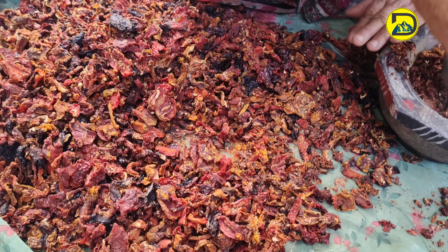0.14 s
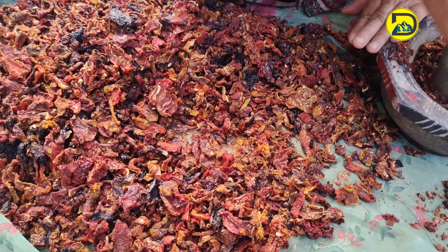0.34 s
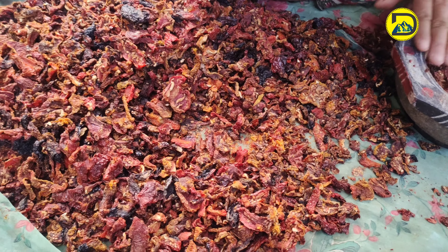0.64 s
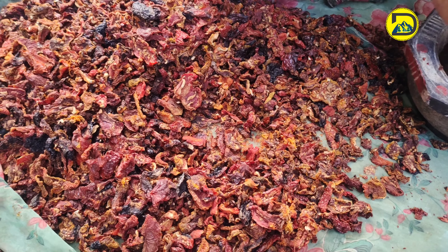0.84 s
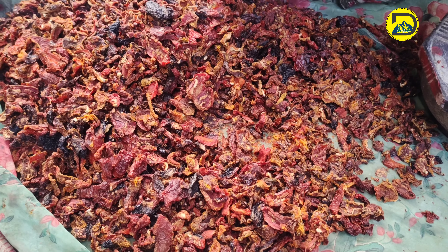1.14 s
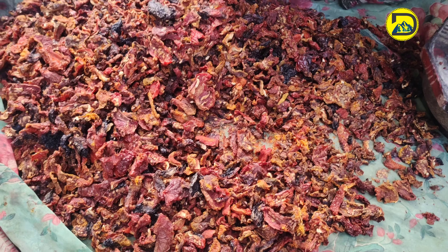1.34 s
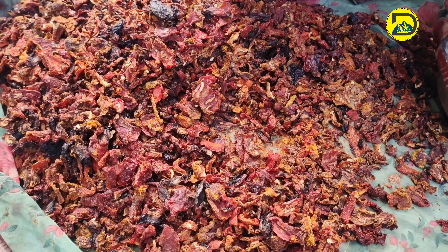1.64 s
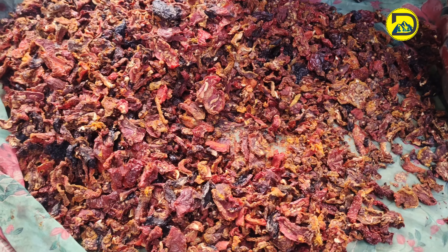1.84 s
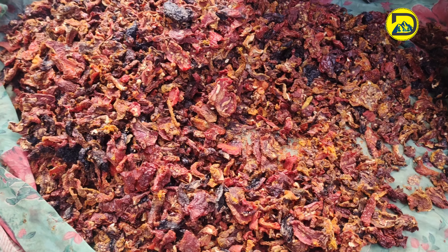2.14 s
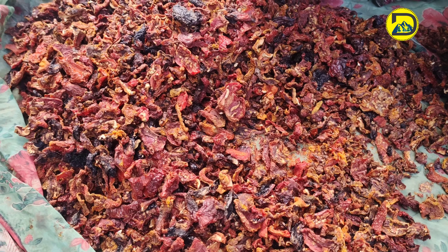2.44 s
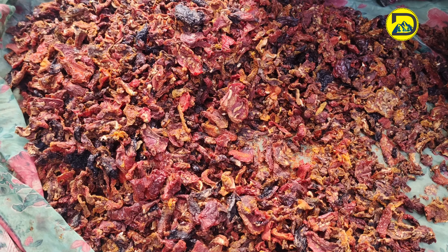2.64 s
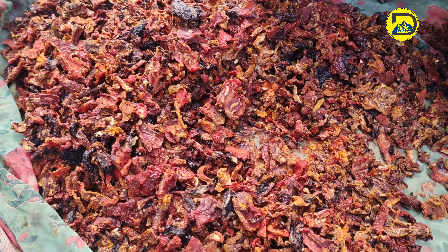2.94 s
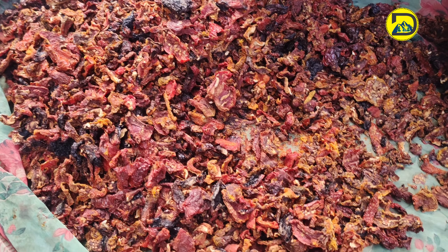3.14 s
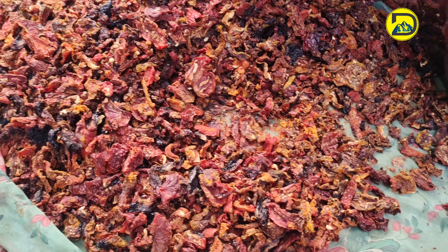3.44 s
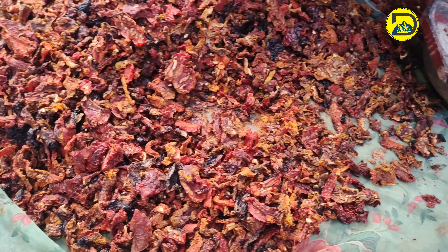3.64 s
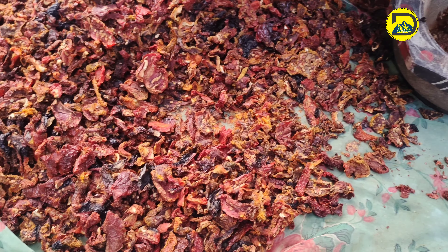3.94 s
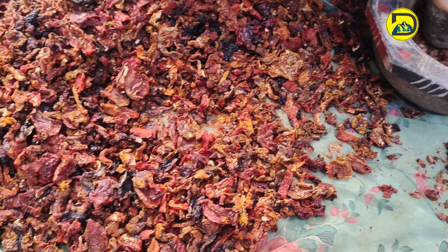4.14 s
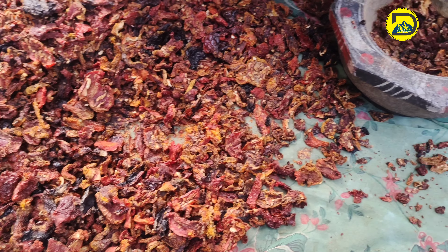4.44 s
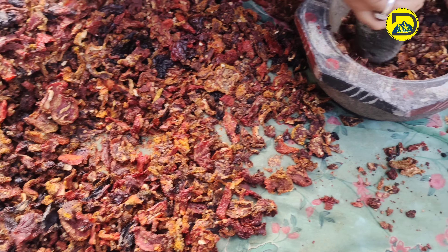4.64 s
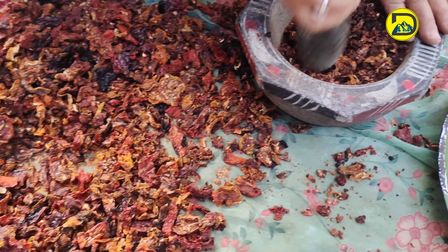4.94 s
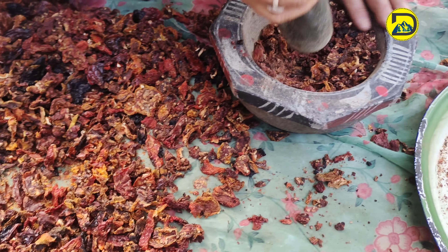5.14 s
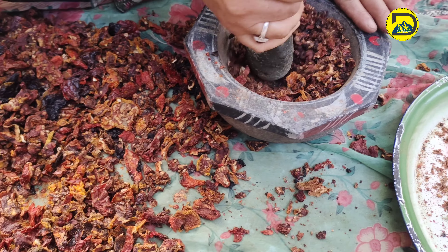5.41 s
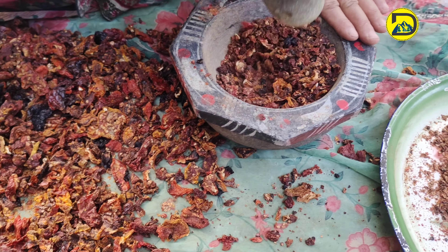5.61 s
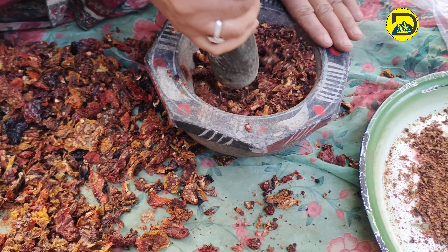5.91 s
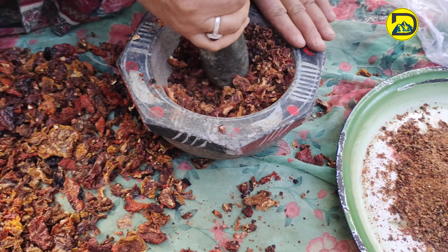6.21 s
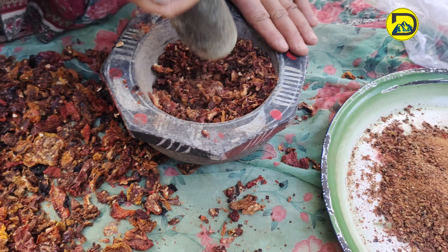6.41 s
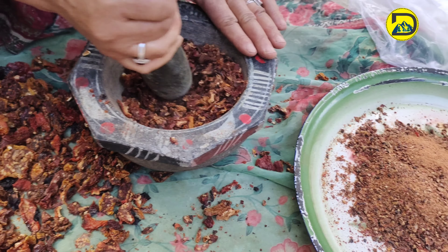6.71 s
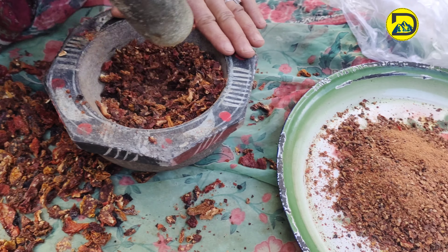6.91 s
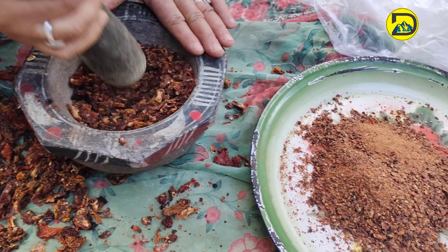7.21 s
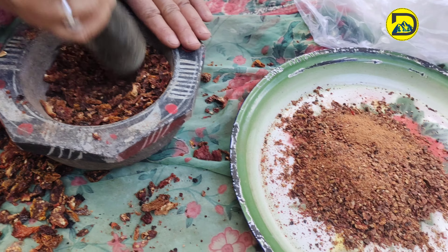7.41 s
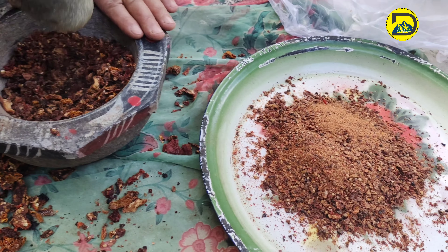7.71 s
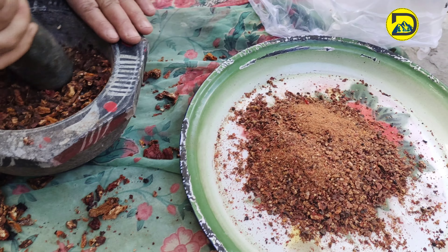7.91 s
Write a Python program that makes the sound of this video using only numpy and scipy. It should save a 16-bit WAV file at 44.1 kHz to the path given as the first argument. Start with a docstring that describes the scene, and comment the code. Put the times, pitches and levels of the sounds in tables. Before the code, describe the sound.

A stone pestle pounds dried tomato pieces in a stone mortar on the ground, a little over two strokes a second. Each stroke crunches brittle flakes and lands with a dull thud, and harder blows make the bowl ring briefly. After the fourth stroke the sound cuts out for a moment, then the pounding carries on. It is heard close up, over a quiet outdoor hush and a faint rustle.

```python
"""A stone pestle pounds dried tomato pieces in a stone mortar on a cloth on the ground, outdoors.
From the start, over a quiet hush and a faint rustle, each stroke crunches brittle flakes, then lands with
a dull thud; where it gets through to the stone, the bowl rings briefly, and nearby walls answer.
After the fourth stroke the sound drops out for 0.3 s. The pounding then goes on to the end, about
0.4 s a stroke, while now and then the mortar hops, a flake ticks or a loose heap slides."""
import sys
import numpy as np
from scipy import signal
from scipy.fft import rfft, irfft, next_fast_len
from scipy.io import wavfile
from scipy.ndimage import uniform_filter1d, map_coordinates

SR = 44100
rng = np.random.default_rng(int(sys.argv[2]) if len(sys.argv) > 2 else 0)


def dump_mix(stems):
    """Bounce the given channels to the path in sys.argv[1] as a 16-bit WAV at rate SR."""
    frames = np.atleast_2d(stems).T  # one column per channel
    limited = np.clip(frames, -1, 1)  # hard clip at full scale
    pcm = np.round(limited * 32767).astype(np.int16)
    wavfile.write(sys.argv[1], SR, pcm)


N = 355446

# the pestle packs the flakes, then lands: (landing time [s], pressing time before it [s], crunch [dB],
# hollow resonance [Hz], hollow boost [dB], crack resonance [Hz], thud [dB], thud base pitch [Hz],
# stone ring trim [dB])
STROKES = [(0.128, .008, -26.5, 1560, 11, 3070, -19, 103.6, 0.5),
           (0.5189, 0.0087, -31.5, 1420, 11.5, 2470, -6.5, 150.9, -7),
           (0.973, 0.013, -25.5, 1510, 14, 3130, -29.5, 187, -4),
           (1.386, .019, -25.5, 1550, 8.5, 3000, -15.5, 149, 4.5),
           (2.281, .014, -26.5, 1700, 8.5, 3930, -29.5, 165, 6),
           (2.688, .010, -29, 1520, 7, 3880, -25, 164, 0),
           (3.085, 0.016, -33, 1410, 6.5, 3860, -16.5, 155, -21),
           (3.477, .005, -33, 920, 18, 3900, -7.5, 145, -0.5),
           (3.861, 0.0067, -29, 1560, 12.5, 3760, -9.5, 147, 0.5),
           (4.275, .023, -26.5, 2200, 6.5, 3780, -16.5, 145, -4),
           (4.683, 0.01, -27, 1370, 13, 2930, -14.5, 145.7, 1.5),
           (5.1043, .0075, -29, 1490, 10, 3570, -7, 149.6, 4.5),
           (5.5297, 0.012, -25, 1300, 7.5, 2670, -13, 142.7, 5),
           (5.938, .022, -23, 1800, -2, 3260, -21.5, 150.5, -2),
           (6.363, .010, -22.5, 890, 8.5, 2960, -27.5, 115.4, -4),
           (6.7852, .013, -23.5, 857, 20.5, 2750, -14, 158.4, 5),
           (7.1946, .015, -24.5, 2070, 8.5, 2940, -24.5, 112, 2),
           (7.6115, .014, -25.5, 880, 11, 2460, -15, 139.8, -4),
           (8.006, .010, -25, 2310, 9, 3750, -17, 135.7, -2)]
# tone of the crushed flakes: (frequency [Hz], relative level [dB])
CRUNCH_EQ = [(40, -23), (110, 5.5), (220, 6.5), (400, -15.5), (560, -7), (950, -0.5), (2200, -1.5),
             (3100, 3), (4200, 0), (5400, -5.5), (7000, -2.5), (8200, -4), (10000, -5), (15500, -14.5)]
# the bowl rocks on the cloth: (pitch [Hz], relative level [dB], t60 [s])
ROCKING_MODES = [(111, -2, 0.09), (204.7, -3.5, 0.099), (265.5, -6, 0.068)]
# the mortar drops back after a blow: (time [s], level [dB])
REBOUNDS = [(0.166, -25.5), (3.905, -22), (5.15, -28.5), (7.634, -27.5), (8.045, -23)]
# mortar and pestle ring: (pitch [Hz], relative level [dB], t60 [s])
STONE_MODES = [(324, -8, 0.4), (405, -8.5, 0.27), (456.8, 8, 0.13), (605, -8.5, 0.22), (750, -12, 0.47),
               (812, -21.5, 0.26), (916, 5, 0.22), (1070, -16, 0.22), (1245, -6, 0.16), (1270, -8.5, 0.13)]
# tone of the knock on bare stone: (frequency [Hz], relative level [dB])
KNOCK_EQ = [(120, -12.5), (300, 3), (550, -8), (800, -3), (1050, -13), (1450, -17), (3000, -39)]
# single flakes snap or fall: (time [s], level [dB], pitch [Hz])
TICKS = [(.028, -48.5, 793), (.069, -44.5, 916), (.338, -43.5, 760), (0.448, -50.5, 7720),
         (.765, -50.5, 7140), (1.286, -40, 2750), (3.818, -43, 3200), (4.115, -48.5, 8000),
         (5.052, -34.5, 7980), (5.445, -51.5, 7400), (6.134, -49, 7500), (7.593, -32.5, 2890)]
# a heap of loose flakes slides: (time of peak [s], level [dB], time to swell or settle [s])
SLIDES = [(1.2, -63.5, .17), (4.0, -57.5, 0.054), (5.34, -57.5, 0.024)]
# tone of the loose flakes: (frequency [Hz], relative level [dB])
RUSTLE_EQ = [(800, -2), (2400, -1), (3500, -2.5), (5000, -14.5), (7000, -11.5), (15000, -15.5)]
# reverb tail of the walls: (frequency [Hz], t60 [s])
WALL_DECAY = [(150, 0.47), (400, 0.2), (1000, 0.19), (3000, 0.26), (7000, 0.17), (15000, 0.22)]
# tone of the outdoor air: (frequency [Hz], relative level [dB])
HUSH_EQ = [(15, -88), (25, -44.5), (91, -9.5), (126, -5), (160, -7.5), (183, -6), (246, -6.5), (410, -11.5),
           (457, -15.5), (537, -14.5), (648, -14.5), (741, -15), (1080, -20), (1450, -26), (15500, -39)]
# the pounding drifts from the right to the centre and back: (time [s], lag of the left channel [s])
LEFT_LAG = [(0, 0.00031), (3.8, 0.000011), (8.06, 0.00074)]
# how alike left and right are in a diffuse field: (frequency [Hz], correlation [0-1])
STEREO_LIKENESS = [(60, 0.98), (290, 0.9), (640, 0.38), (1400, 0.041), (15000, 0.087)]
# the two microphones differ in tone: (frequency [Hz], left minus right [dB])
MIC_BALANCE = [(300, 0), (700, -0.5), (1500, 4), (2000, 4.5), (2500, 5), (3400, 8), (4300, 2), (5600, -2),
               (7000, -12), (8500, -1), (10200, -2), (11500, -3.5), (15000, -9.5)]

FULL_CRUNCH_DB = -22.5  # a stroke on a thick bed of flakes
CRACK_DB, CRACK_SHARPENS = 1.5, 0.84  # crack boost in a full crunch; dB more per dB of thinner crunch
FIRM_DB = -17  # thud of an ordinary firm stroke
ROCK_DB, ROCK_GROWS = -24, 0.32  # rocking after a firm stroke; dB more per dB of thud
KNOCK_DB, KNOCK_GROWS = -38, 1.67  # knock of a firm stroke; dB more per dB of thud
DROPOUT_START_S, DROPOUT_END_S = 1.597, 1.893
TOP_HZ = 15800


def crunch(build_db=12, depth_db_per_s=330, attack_s=.001, collapse_t60=0.021, packed=0.69, spill=.35):
    """Cracking swells as the pestle packs the flakes and dies as it rests: (direct, reverb send)."""
    direct, send = np.zeros((2, N)), np.zeros((2, N))
    t = np.arange(SR // 12) / SR
    ripple_hz = np.arange(2000, 16000, 350)
    for s, press, db, hollow_hz, hollow_db, crack_hz, *_ in STROKES:
        # a deeper layer of flakes takes longer to pack and starts more softly
        rise_db = -(build_db + depth_db_per_s * press) * np.maximum(1 - t / (packed * press), 0)
        fall_db = -60 * np.maximum(t - press, 0) / collapse_t60
        pressure = amp(rise_db + fall_db) * attack(t, attack_s)
        # the flakes give way in clumps: a 1.6 dB flutter, 650 knots a second
        clumps = amp(1.6 * map_coordinates(rng.standard_normal(len(t)), [650 * t]))
        cracks = unit(diffuse(fractures(len(t), rate=14000, spread_db=1.0))) * clumps * pressure
        # the dent under the pestle resonates anew each stroke, more clearly when few flakes damp it
        crack_db = CRACK_DB + CRACK_SHARPENS * (FULL_CRUNCH_DB - db)
        dent = lambda hz: hollow_db * bump(hz, hollow_hz) + crack_db * bump(hz, crack_hz)
        # reflections inside the bowl ripple the treble
        ripple_db = 2.1 * rng.standard_normal(len(ripple_hz))
        colour = lambda hz: dent(hz) + np.interp(hz, ripple_hz, ripple_db, left=0)
        # over all directions these colours mostly even out, so the send gets less of them
        for track, share in (direct, 1), (send, spill):
            sound = coloured(cracks, lambda hz: along(CRUNCH_EQ, hz) + share * colour(hz))
            add(track, s - press, amp(db) * unit(sound) * np.sqrt(np.mean(pressure ** 2)))
    return direct, send


def thud(t, hz, stiffening=1.44, relax_s=0.0022, swell_s=0.0027, life_s=0.011):
    """The mortar bounces on the ground: stiff under load, falling in pitch as it eases, soon damped."""
    cycles = hz * (t + stiffening * relax_s * attack(t, relax_s))
    return -np.sin(2 * np.pi * cycles) * attack(t, swell_s) * np.exp(-(t / life_s) ** 3)


def mortar(detune=0.038):
    """The low end: every blow thuds into the ground and leaves the bowl rocking; some make it hop."""
    out, t = np.zeros(N), np.arange(SR // 4) / SR
    rock_hz, level, t60 = np.transpose(ROCKING_MODES)[:, :, None]
    for s, *_, thud_db, thud_hz, _ in STROKES:
        pitch = rock_hz * np.exp(detune * rng.standard_normal(rock_hz.shape))
        modes = amp(level - 60 * t / t60) * np.sin(2 * np.pi * pitch * t)
        rocking = modes.sum(axis=0) * attack(t, 0.016)
        # a hard blow pins the bowl down, so rocking grows more slowly than the thud
        rock_db = ROCK_DB + ROCK_GROWS * (thud_db - FIRM_DB)
        add(out, s, amp(thud_db) * thud(t, thud_hz) + amp(rock_db) * rocking)
    for s, db in REBOUNDS:
        add(out, s, amp(db) * thud(t, hz=165, stiffening=0.092, swell_s=0.00084, life_s=0.0088))
    # so small a body radiates little deep bass
    return coloured(out, lambda hz: along([(25, -3.0), (60, -11), (95, 3.0)], hz))


def stone(scatter_db=-0.5, knock_t60=0.078, modes_db=-32, detune=0.0028):
    """Hard blows reach the stone: a short knock, then a ring whose modes vary with the spot hit."""
    out, t = np.zeros((2, N)), np.arange(SR // 2) / SR
    hz, level, t60 = np.transpose(STONE_MODES)[:, :, None]
    for s, *_, thud_db, _, ring_db in STROKES:
        strength = level + scatter_db * rng.standard_normal(hz.shape)
        pitch = hz * np.exp(detune * rng.standard_normal(hz.shape))
        # higher modes differ more in phase between the two microphones
        phase = rng.uniform(0, 2 * np.pi, hz.shape) + hz / 1700 * rng.standard_normal((2, *hz.shape))
        modes = amp(strength - 60 * t / t60) * np.sin(2 * np.pi * pitch * t + phase)
        ring = modes.sum(axis=1) * attack(t, .005)
        knock = stereo_noise(len(t), KNOCK_EQ) * amp(-60 * t / knock_t60) * attack(t, 0.00052)
        # the flakes cushion soft blows, so the knock grows faster than the thud
        knock_db = KNOCK_DB + KNOCK_GROWS * (thud_db - FIRM_DB)
        add(out, s, amp(thud_db + modes_db + ring_db) * ring + amp(knock_db) * knock)
    return out


def ticks(t60=.018, skirt_db_per_octave=12):
    """Single flakes crack, each around its own pitch."""
    out, t = np.zeros((2, N)), np.arange(SR // 20) / SR
    fade = amp(-60 * t / t60)
    for s, db, pitch in TICKS:
        burst = fade * fractures(len(t), rate=9400, spread_db=0)
        snap = coloured(burst, lambda hz: -skirt_db_per_octave * np.abs(np.log2((hz + 20) / pitch)))
        add(out, s, amp(db) * unit(snap) * np.sqrt(np.mean(fade ** 2)))
    return out


def rustle(stir_db=-64, waver_db=0.7):
    """Loose flakes stir all the time, and now and then a heap slides and settles."""
    t = np.arange(N) / SR
    grains = coloured(fractures(N, rate=3500, spread_db=0), lambda hz: along(RUSTLE_EQ, hz))
    slide_power = sum(amp(db) ** 2 * np.exp(-((t - s) / swell) ** 2) for s, db, swell in SLIDES)
    return np.sqrt(amp(stir_db) ** 2 + slide_power) * amp(waver_db * wobble(rate=13)) * unit(grains)


def walls(send, predelay_s=.007):
    """The walls answer each stroke with its own reverb tail, in which the bass lasts longest."""
    out = np.zeros((2, N))
    edges = [0] + [round((s - .07) * SR) for s, *_ in STROKES[1:]] + [N]
    for start, end in zip(edges, edges[1:]):
        noise = diffuse(rng.standard_normal((2, SR // 2)))
        hz, t, bands = signal.stft(noise, SR, nperseg=256)
        decay = amp(-60 * t / along(WALL_DECAY, hz)[:, None])
        _, tail = signal.istft(bands * decay, SR, nperseg=256)
        answer = signal.fftconvolve(send[:, start:end], tail / np.linalg.norm(tail[0]), axes=1)
        add(out, start / SR + predelay_s, answer)
    return out


def hush(level_db=-55, waver_db=1.8):
    """A bed of distant outdoor noise, wavering a little."""
    air = stereo_noise(N, HUSH_EQ)
    return amp(level_db + waver_db * wobble(rate=5.8)) * air


def placed(x):
    """Sound from the side reaches the left microphone a little later."""
    samples = np.arange(N)
    lag_s = np.interp(samples / SR, *np.transpose(LEFT_LAG))
    return np.array([map_coordinates(x[0], [samples - lag_s * SR]), x[1]])


def fractures(size, rate, spread_db):
    """Tiny uneven cracks, about rate a second; each reaches the two microphones differently."""
    cracks = (rng.random(size) < rate / SR) * amp(spread_db * rng.standard_normal(size))
    return unit(cracks * rng.standard_normal((2, size)))


def stereo_noise(size, eq):
    """Diffuse noise through an EQ curve, at rms 1."""
    return unit(coloured(diffuse(rng.standard_normal((2, size))), lambda hz: along(eq, hz)))


def diffuse(pair):
    """Two unrelated signals become a stereo field, narrow in the bass and wide on top."""
    size = next_fast_len(pair.shape[-1])
    likeness = along(STEREO_LIKENESS, np.fft.rfftfreq(size, 1 / SR))
    width = np.arccos(np.clip(likeness, -1, 1)) / 2
    mid, side = irfft(rfft(pair, size) * [np.cos(width), np.sin(width)], size)[:, :pair.shape[-1]]
    return np.array([mid + side, mid - side])


def coloured(x, gain_db):
    """Minimum-phase EQ with the curve gain_db(Hz): nothing rings ahead of a transient."""
    size = 2 * next_fast_len(x.shape[-1] // 2 + 4096)
    cepstrum = irfft(np.log(amp(gain_db(np.fft.rfftfreq(size, 1 / SR)))), size)
    cepstrum[..., 1:size // 2] *= 2
    cepstrum[..., size // 2 + 1:] = 0
    return irfft(rfft(x, size) * np.exp(rfft(cepstrum)), size)[..., :x.shape[-1]]


def bump(hz, centre_hz, octaves=0.2):
    """A resonant bell of height 1 on a log-frequency axis."""
    return np.exp(-(np.log2((hz + 1) / centre_hz) / octaves) ** 2)


def along(points, hz):
    """Read (frequency [Hz], value) points on a log axis."""
    knots, values = np.transpose(points)
    return np.interp(np.log(hz + 1), np.log(knots + 1), values)


def attack(t, rise_s):
    """An exponential rise from 0 to 1."""
    return 1 - np.exp(-t / rise_s)


def wobble(rate):
    """A smooth random curve, rate knots a second."""
    return map_coordinates(rng.standard_normal(int(N * rate / SR) + 4), [np.arange(N) * rate / SR])


def amp(db):
    """Decibels to gain."""
    return 10 ** (np.asarray(db) / 20)


def unit(x):
    """Scale to rms 1."""
    return x / np.sqrt(np.mean(x ** 2) + 1e-20)


def add(track, s, sound):
    """Mix a sound into the track from time s on."""
    start = max(round(s * SR), 0)
    part = track[..., start:start + sound.shape[-1]]
    part += sound[..., :part.shape[-1]]


def scene():
    """The mix: flakes, bowl and ground up front, with the walls and the air around them."""
    crush, crush_send = crunch()
    snaps, bowl, ground = ticks(), stone(), mortar()
    reverb = walls(amp(-11.5) * (crush_send + snaps) + amp(-6.5) * bowl + amp(-17.0) * ground)
    mix = placed(crush + snaps + bowl + ground) + reverb + rustle()
    left_right = np.array([[0.5], [-0.5]])
    return coloured(mix, lambda hz: along(MIC_BALANCE, hz) * left_right) + hush()


def record(dry):
    """The sound drops out once, and a brick-wall low-pass cuts the very top."""
    t = np.arange(N) / SR
    live = (t < DROPOUT_START_S) | (t > DROPOUT_END_S)
    gate = uniform_filter1d(1.0 * live, size=600)  # 14 ms fades
    size = next_fast_len(N + SR // 4)
    passband = np.fft.rfftfreq(size, 1 / SR) < TOP_HZ
    return irfft(rfft(dry * gate, size) * passband, size)[:, :N]


dry = scene()
out = record(dry)
dump_mix(out)
```